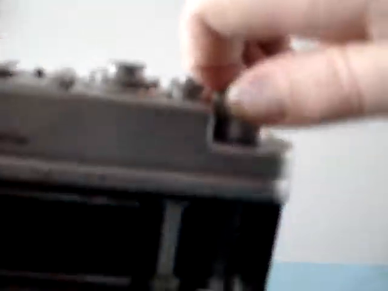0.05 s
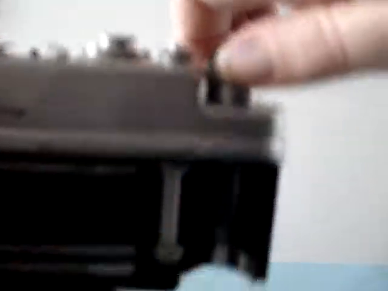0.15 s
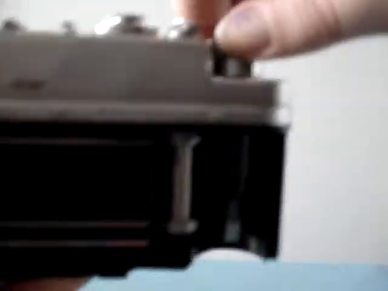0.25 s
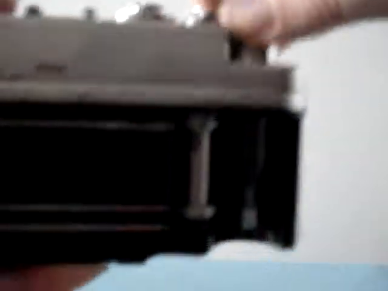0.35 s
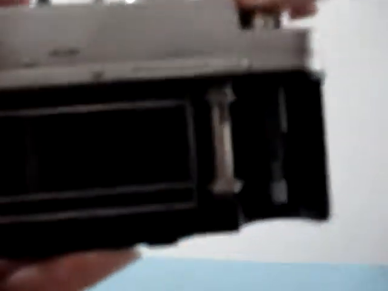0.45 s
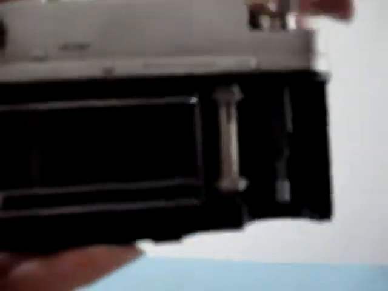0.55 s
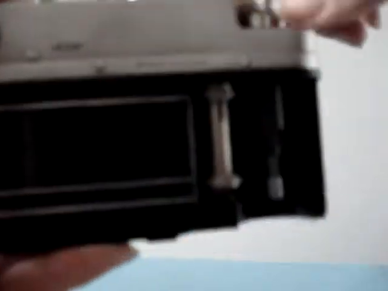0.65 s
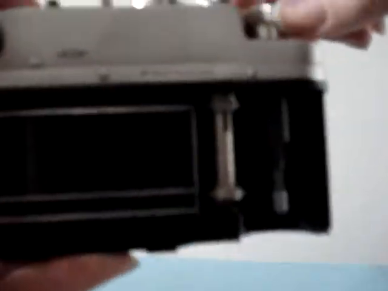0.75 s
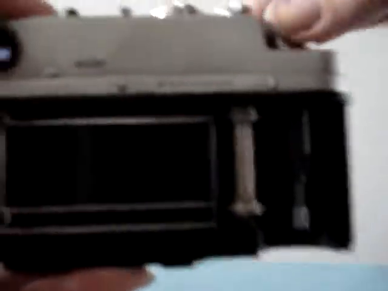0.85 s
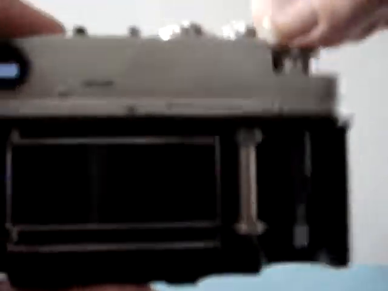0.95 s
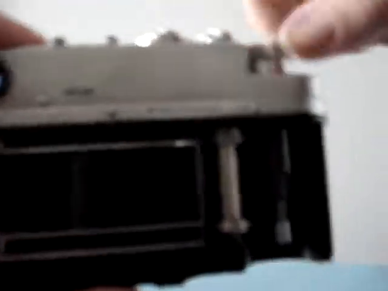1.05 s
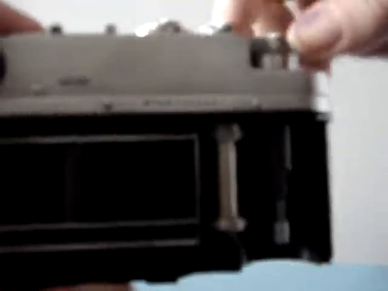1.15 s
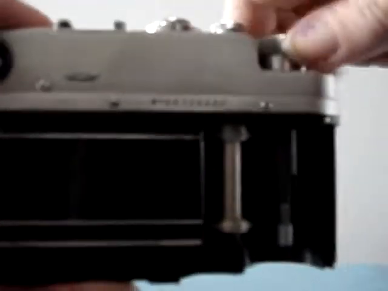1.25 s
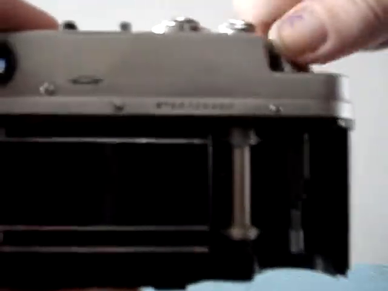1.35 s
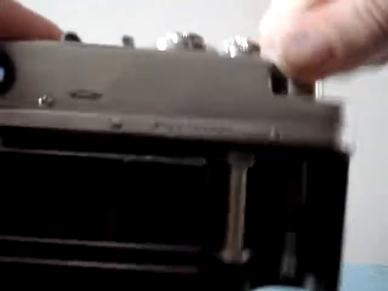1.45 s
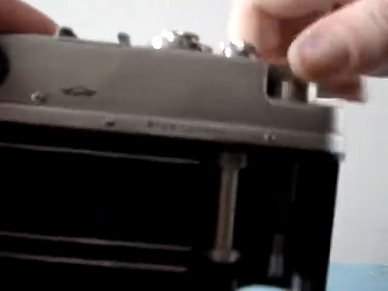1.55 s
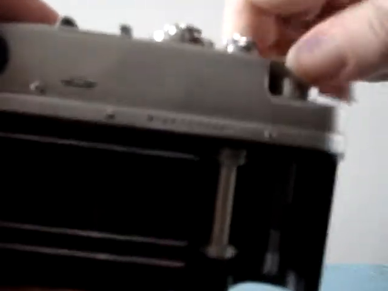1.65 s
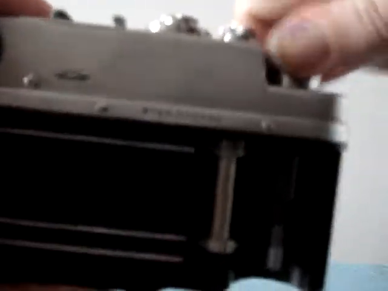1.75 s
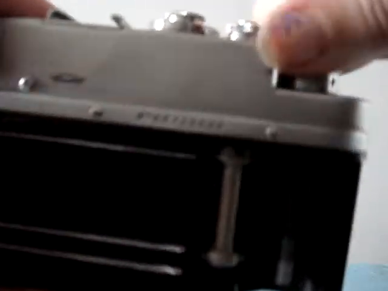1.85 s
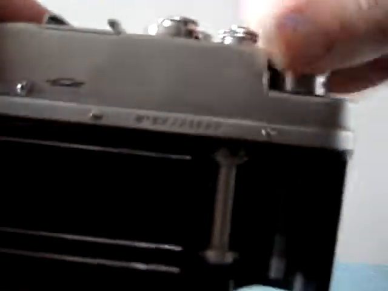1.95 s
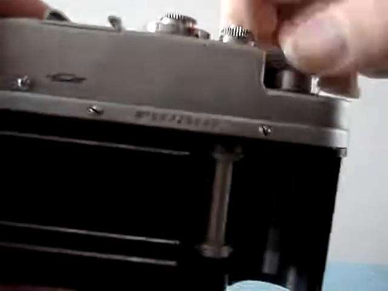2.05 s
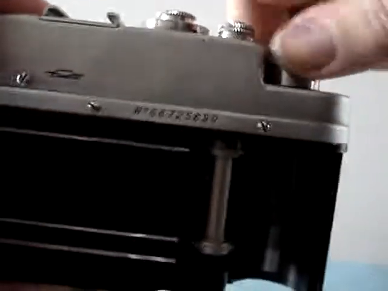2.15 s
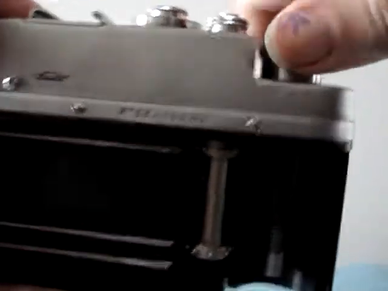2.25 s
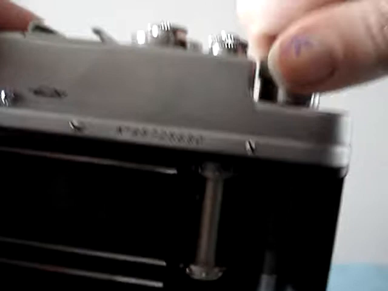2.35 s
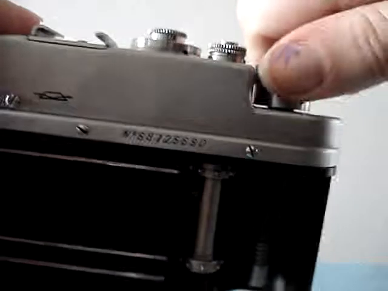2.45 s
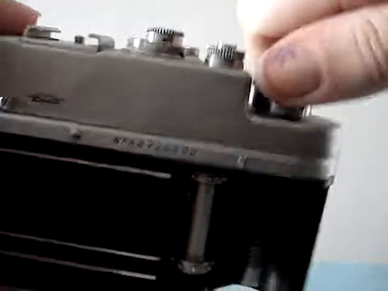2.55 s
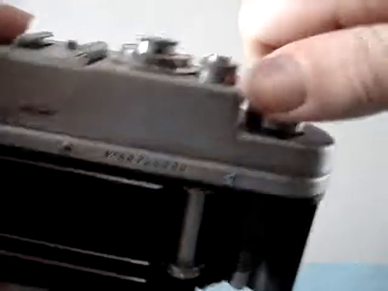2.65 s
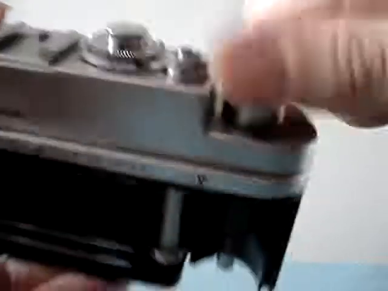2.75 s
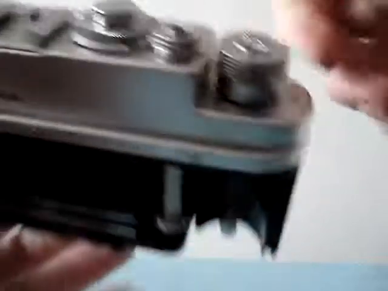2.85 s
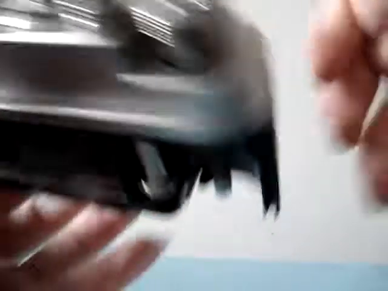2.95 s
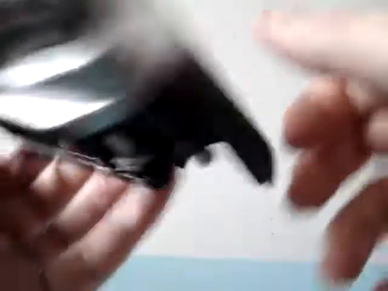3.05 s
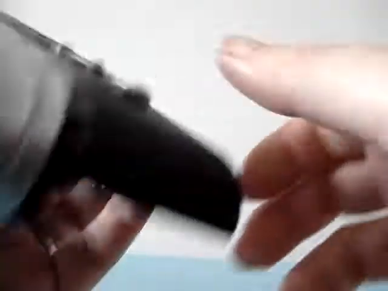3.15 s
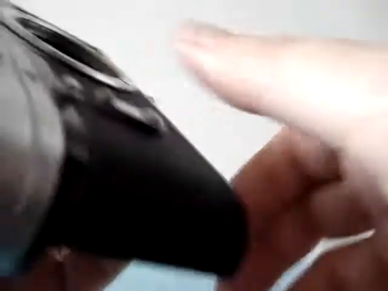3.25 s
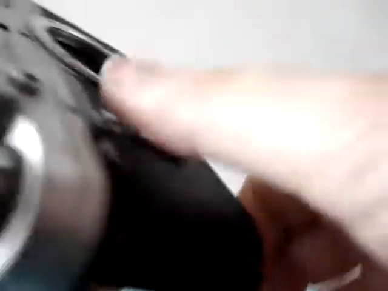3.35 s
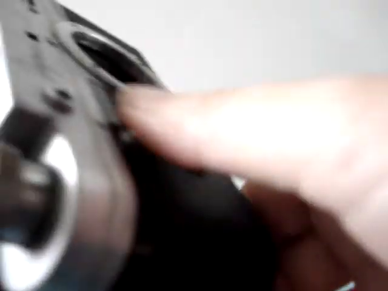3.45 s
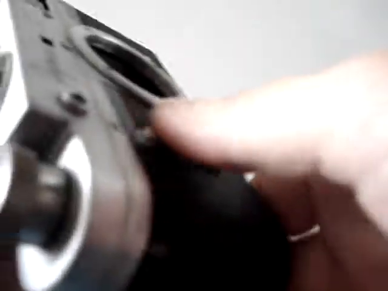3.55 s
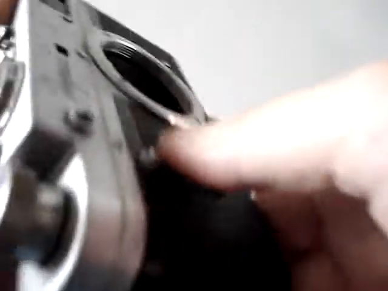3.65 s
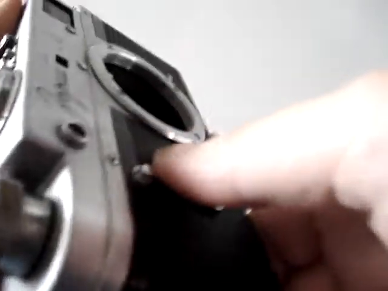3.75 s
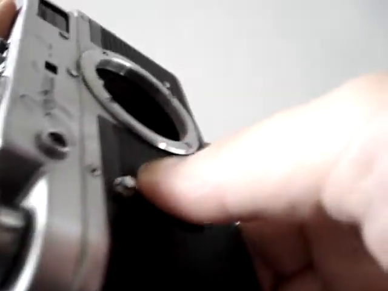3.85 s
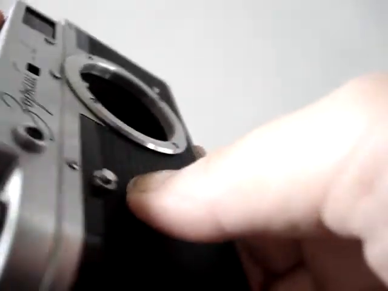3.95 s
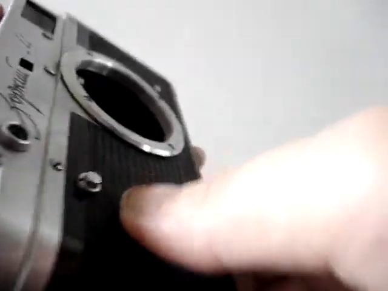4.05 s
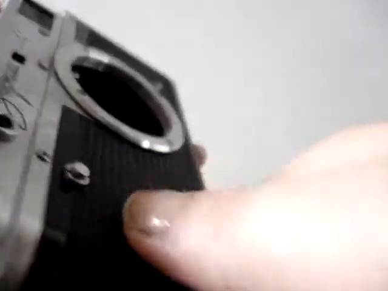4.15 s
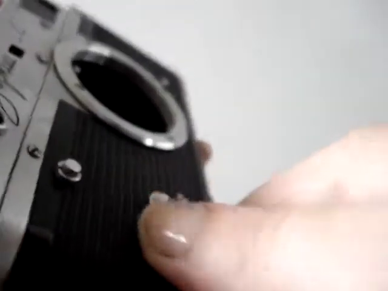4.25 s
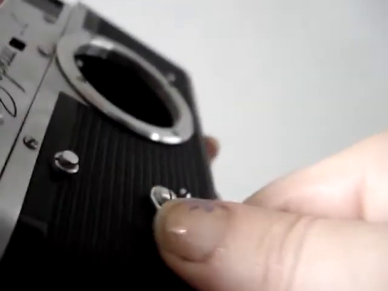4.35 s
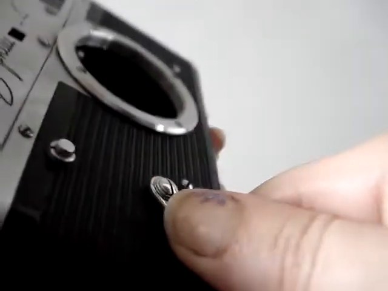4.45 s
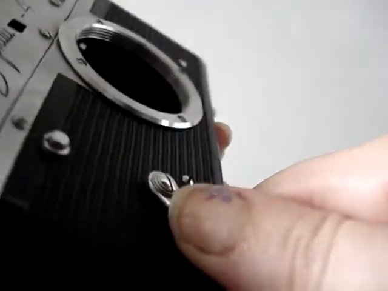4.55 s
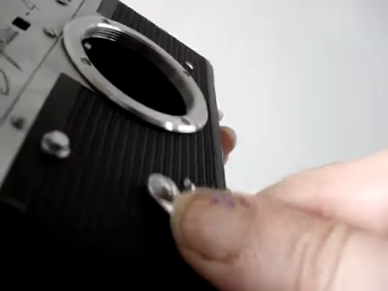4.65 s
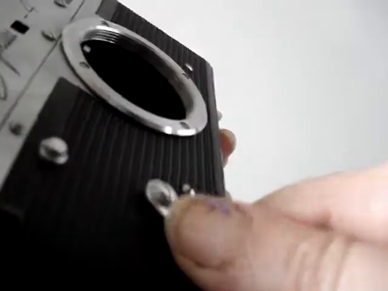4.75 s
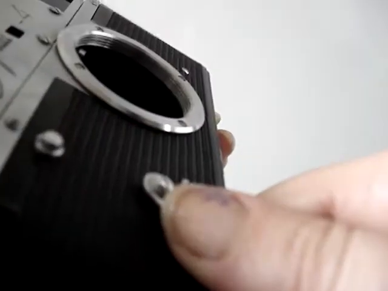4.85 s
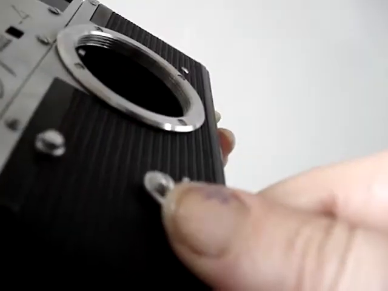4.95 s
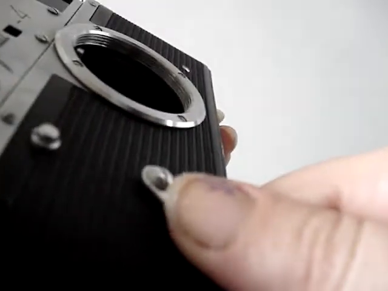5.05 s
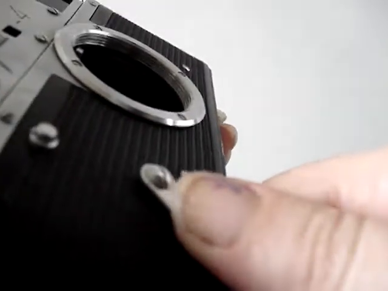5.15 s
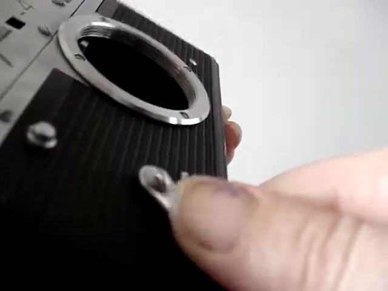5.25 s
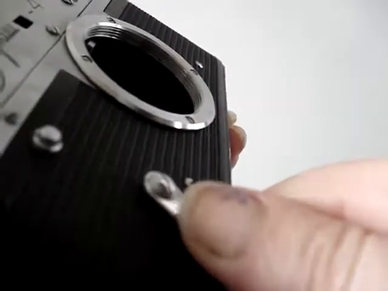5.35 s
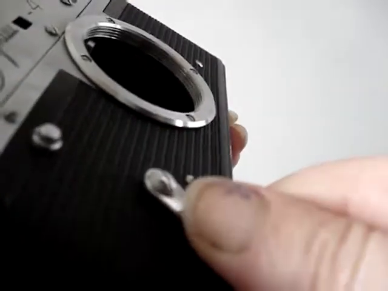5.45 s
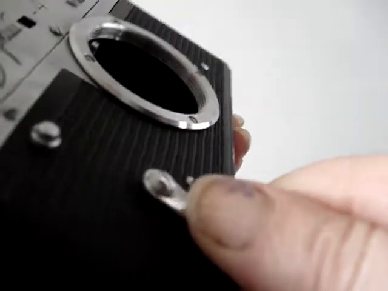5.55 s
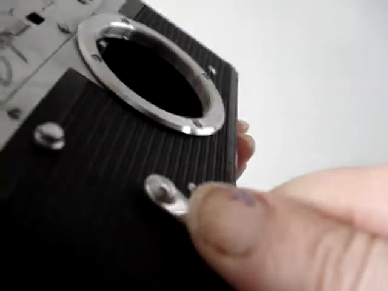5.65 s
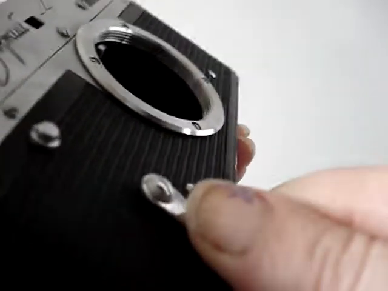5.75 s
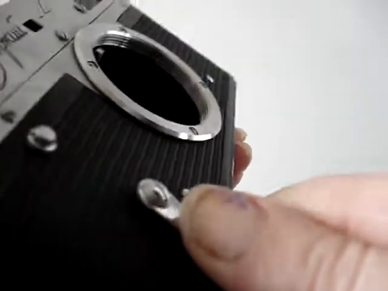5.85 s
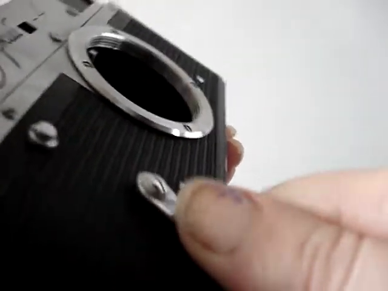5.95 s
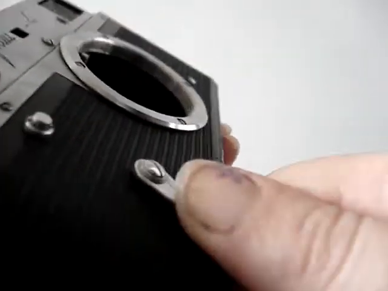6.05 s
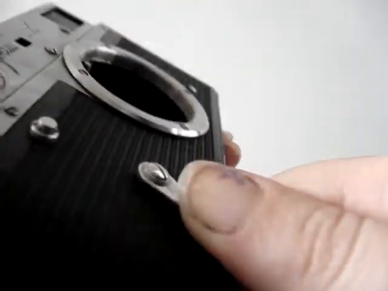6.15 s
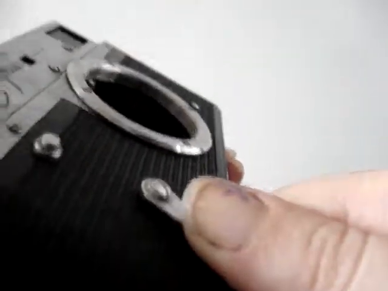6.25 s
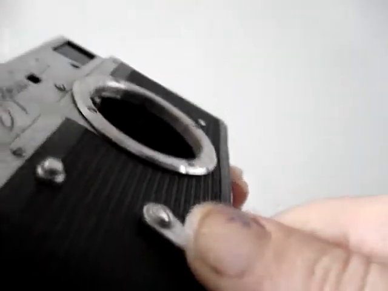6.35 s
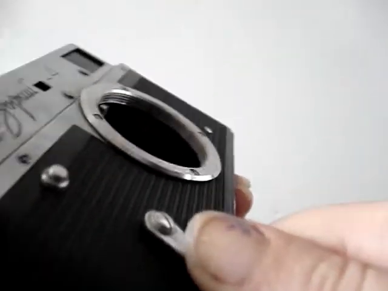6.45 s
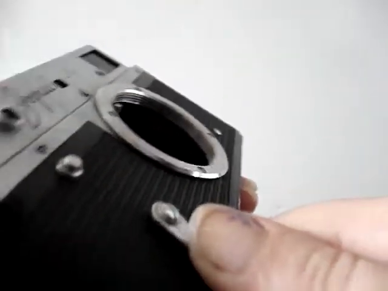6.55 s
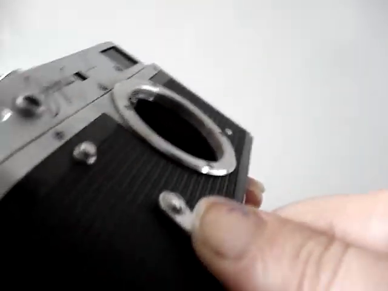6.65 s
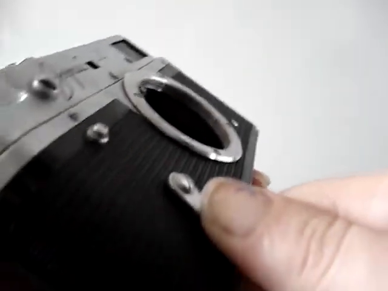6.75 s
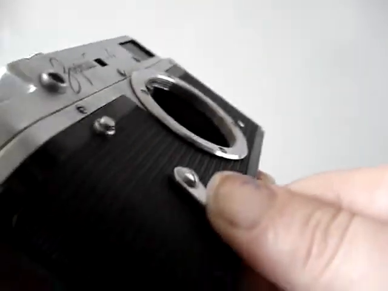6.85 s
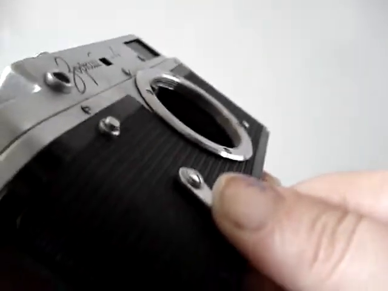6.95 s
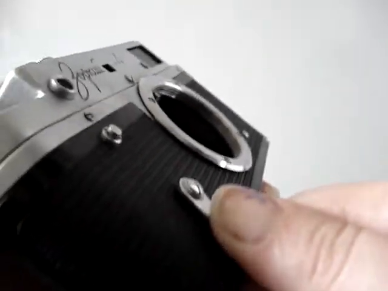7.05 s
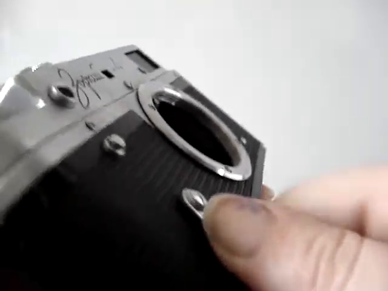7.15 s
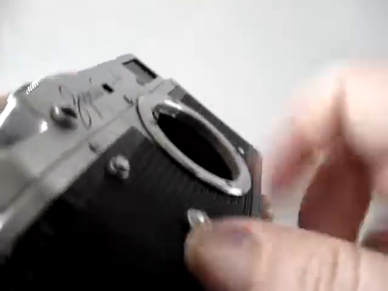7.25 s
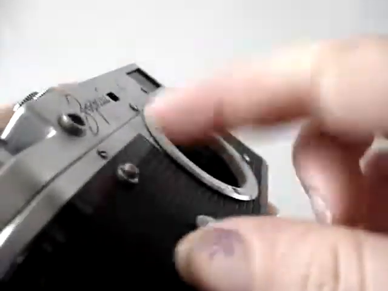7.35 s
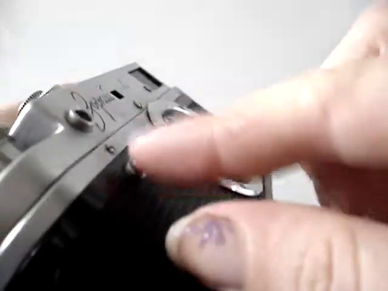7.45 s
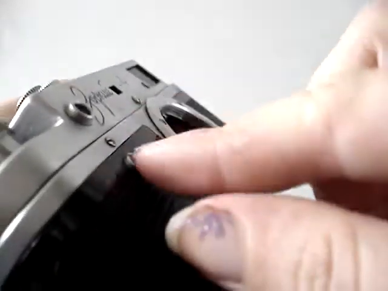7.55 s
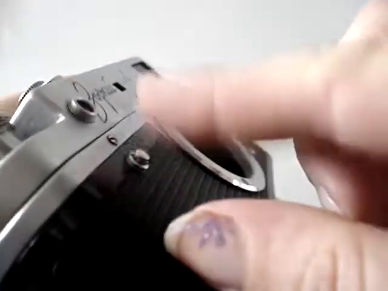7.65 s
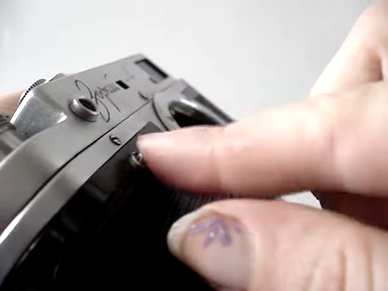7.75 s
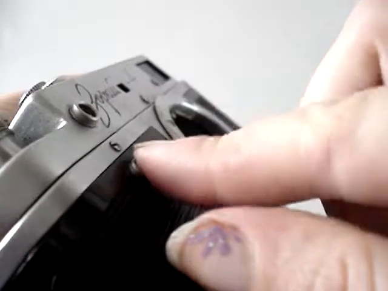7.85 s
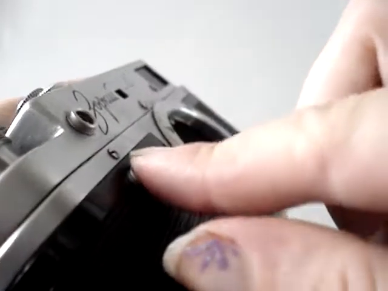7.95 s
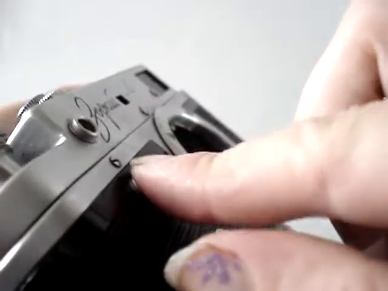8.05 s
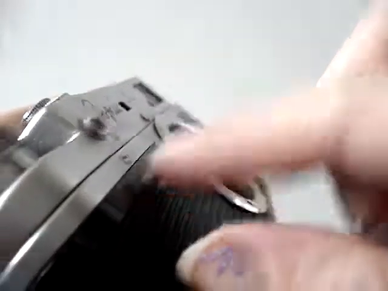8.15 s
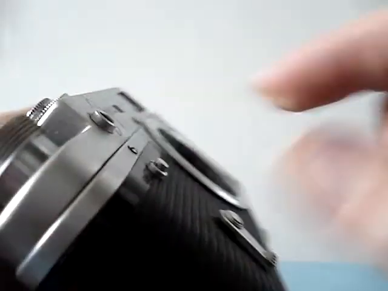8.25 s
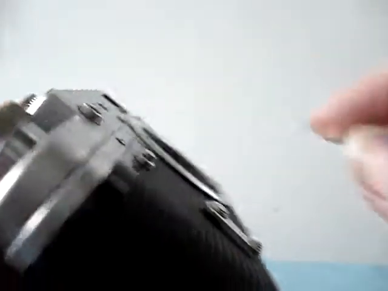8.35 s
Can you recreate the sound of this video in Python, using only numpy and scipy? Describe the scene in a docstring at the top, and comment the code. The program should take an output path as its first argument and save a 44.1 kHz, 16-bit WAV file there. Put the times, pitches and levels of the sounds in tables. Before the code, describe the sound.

An old metal camera is handled close to the microphone while a fan whirrs softly in the room. Its rewind knob scrapes and ticks unevenly, with one sharp snap. The self-timer lever is then wound in a quick ratcheting run, followed by a sharp click and a few single teeth. Near the end a button is pressed and the clockwork starts a bright, rapid buzz with a few low bumps.

```python
"""Handling a clockwork camera

An old mechanical camera is handled close to a mono microphone, over the whirr of a fan. Its rewind knob
scrapes and ticks; the self-timer lever is wound over a ratchet, in a run and then tooth by tooth; a button
frees the clockwork, whose escapement buzzes. Friction and impacts excite the resonances of the metal."""
import sys
import numpy as np
from scipy import signal
from scipy.fft import rfft, irfft, next_fast_len
from scipy.io import wavfile
from scipy.ndimage import map_coordinates

SR = 44100
rng = np.random.default_rng(int(sys.argv[2]) if len(sys.argv) > 2 else 0)


def unload_wav(signal):
    """Save mono or channel-first audio to the path in sys.argv[1] as 16-bit WAV at rate SR, clipped to [-1, 1]."""
    wavfile.write(
        sys.argv[1],
        SR,
        np.round(np.clip(np.atleast_2d(signal).T, -1, 1) * 32767).astype(np.int16),
    )


N = 370440
TOP_HZ = 10080

# the fan's air noise: (frequency [Hz], relative spectral level [dB])
FAN_AIR = [(15, -52), (25, -23), (48, -13.5), (113, -7), (141, -5), (168, -6.5), (195, -3), (271, -4.5),
           (619, -4.5), (795, -7.5), (2280, -14.5), (2520, -15), (7590, -22.5), (8180, -22.5),
           (10000, -26.5), (13000, -53), (22000, -120)]
# its hum and thin whines: (frequency [Hz], level [dB], width [Hz], unsteady share [0-1])
FAN_HUM = [(196, -72.5, 6, .35), (245, -78, 6, .35), (442, -74, 8, .4), (548, -77, 25, .6),
           (622, -75, 14, .7), (638, -69, 6, .3), (687, -73.5, 6, .35), (735, -78, 6, .35)]
FAN_WHINES = [(2848, -84, 6, .25), (8129, -75, 12, .2)]
# the room's decay: (frequency [Hz], reverberation time [s])
ROOM_T60 = [(200, 1), (2000, 0.23), (10000, 0.14)]
# low thumps under the sharpest jolts: (time [s], peak level [dB], decay time [s])
JOLTS = [(1.88, -32.5, 0.0051), (3.564, -32.5, 0.0087), (7.927, -31.5, 0.011), (7.951, -31.5, 0.019),
         (8.044, -35.5, .011), (8.08, -41, 0.014), (8.209, -44, .012)]

# resonances of the case as each part excites it: (frequency [Hz], width [Hz], relative level [dB])
KNOB_MODES = [(543, 114, -4.5), (1060, 150, -3), (1520, 95, -1), (1836, 95, 3), (2600, 48, -5.5),
              (3340, 40, -17.5), (5330, 150, -13.5), (5920, 140, -16), (7600, 740, -20)]
SHAFT_MODES = [(1520, 90, 2), (2200, 150, -7), (2500, 90, -3), (3480, 130, 6.5), (5360, 160, -3),
               (5900, 170, -1), (7310, 140, -2), (7900, 230, -1.5), (9130, 240, -0.5)]
STOP_MODES = [(1223, 57, 7), (2400, 260, -6), (3510, 150, 2.5), (5130, 170, -4.5), (5900, 220, -2),
              (6920, 220, -2), (8500, 170, 1), (9650, 500, -5.5)]
PAWL_MODES = [(1215, 90, -5.5), (1800, 50, -7), (2050, 120, -10), (2360, 55, -4), (2550, 55, -4),
              (2860, 110, -5), (3470, 250, -3.5), (4400, 120, -10), (4700, 150, -10), (5240, 130, -4),
              (5720, 140, 1), (6090, 260, -2), (7100, 400, -4), (8230, 220, 0.5), (9110, 450, 2)]
CLOCKWORK_MODES = [(1200, 65, -10), (1530, 45, -14), (1800, 45, -9), (2360, 50, -6), (2530, 55, -7),
                   (2850, 60, -7), (2960, 65, -3), (3120, 45, -6), (3560, 120, -3.5), (3760, 90, -8),
                   (4380, 110, -3.5), (5110, 60, -3.5), (5400, 160, -8), (5710, 160, -1.5),
                   (5955, 60, -2.5), (6130, 160, -5), (6410, 60, -4), (7590, 130, -6), (7900, 200, -4),
                   (8510, 120, -3.5), (9080, 380, 0), (9680, 260, -1.5)]
# the dense, heavily damped ring between them: (frequency [Hz], relative spectral level [dB])
KNOB_BODY = [(300, -32), (700, -13), (1100, -2), (1800, 5), (2800, -5), (5000, -13.5), (10000, -16.5)]
STOP_BODY = [(300, -12), (900, -15), (1300, -1.5), (2500, 8.5), (4200, -4.5), (7000, -12), (10000, -4)]
PAWL_BODY = [(590, -49), (1000, -49), (1220, -17.5), (1500, -13), (2860, -9.5), (4120, -8), (5830, 0.5),
             (7640, 5.5), (8910, 10), (10000, 1), (13000, -43), (22000, -120)]
CLOCKWORK_BODY = [(350, -54), (600, -27), (961, -62), (1250, -6.5), (1630, -15), (1750, -8.5), (2870, -5),
                  (4390, -6), (4650, -6), (5750, -8), (6700, -6.5), (7630, -3), (10000, -1), (13000, -38),
                  (22000, -120)]

# single contacts: (time [s], low-band level [dB], high-band level [dB])
KNOB_KNOCKS = [(0.2865, -38.5, -46), (0.3067, -51, -50.5), (0.3812, -42.5, -63), (0.7126, -49.5, -63),
               (0.7546, -43.5, -65), (0.8367, -47, -50), (0.8598, -40, -48), (0.8722, -48, -47.5),
               (1.0421, -49, -51), (1.1426, -59, -52.5), (1.3112, -43.5, -52), (1.321, -42, -46.5),
               (1.3527, -46, -45.5), (1.383, -43.5, -46.5), (1.7254, -47.5, -54), (1.7607, -58, -47.5),
               (1.8247, -49, -47.5), (1.9693, -51.5, -54), (2.1471, -47.5, -47.5), (2.1686, -40.5, -54),
               (2.2042, -50, -45), (2.7132, -51, -53.5), (2.7808, -42.5, -51)]  # the rewind knob catches hard in its seat
SHAFT_SNAPS = [(1.879, -35, -28.5)]  # its shaft snaps home
STOP_CLICKS = [(3.5641, -50, -42), (4.8043, -35, -33), (7.1077, -46, -48.5), (7.8487, -48, -55)]  # the timer's lever and button meet their stops
# fingers twist the knob: (centre time [s], Gaussian half-width [s], relative level [dB])
KNOB_RUBS = [(0.4, 0.024, -53.5), (0.76, 0.014, -55), (0.863, 0.02, -46), (0.955, 0.016, -55),
             (1.389, 0.045, -55), (1.799, 0.042, -53), (2.207, 0.009, -51)]
# the thumb winds the lever in one run: (time [s], teeth passed [count])
LEVER_TRAVEL = [(3.917, 0), (3.978, 8), (4.015, 11), (4.05, 12), (4.068, 13), (4.174, 22), (4.267, 33),
                (4.331, 38), (4.412, 45), (4.443, 47), (4.47, 48), (4.591, 54)]
# then nudges it on tooth by tooth: (time [s], level relative to a tooth of the run [dB])
LEVER_NUDGES = [(4.6692, 1), (5.3474, 1), (5.3681, 1.5), (5.3793, -3), (5.3948, 1.5), (5.5009, 2.5),
                (5.5193, 1.5), (5.5354, 2.5), (5.5545, 3), (5.6512, 1.5), (5.7215, -0.5), (5.9365, -0.5),
                (5.9404, 2)]
# the running escapement: (time [s], beat rate [Hz])
BEAT_RATE = [(7.92, 270), (8.03, 258), (8.1, 270), (8.17, 270), (8.22, 360), (8.27, 305), (8.33, 293),
             (8.4, 430)]


def amp(db):
    """Amplitude ratio of a level in decibels."""
    return 10 ** (np.asarray(db) / 20)


def unit(x):
    """The signal scaled to an rms of 1."""
    return x / np.sqrt(np.mean(x ** 2) + 1e-20)


def sample_times():
    """The time of every sample in seconds."""
    return np.arange(N) / SR


def along(points, hz):
    """Interpolation of (frequency, value) points on a logarithmic frequency axis."""
    f, v = np.transpose(points)
    return np.interp(np.log(hz + 1), np.log(f + 1), v)


def wobble(rate):
    """Smooth random modulation: a spline through rate knots a second."""
    return map_coordinates(rng.standard_normal(int(N * rate / SR) + 4), [np.arange(N) * rate / SR])


def filtered(x, response):
    """Zero-phase filtering: the spectrum is multiplied by a gain that depends on frequency."""
    size = next_fast_len(N + SR // 2)
    return irfft(rfft(x, size) * response(np.fft.rfftfreq(size, 1 / SR)), size)[:N]


def crossover(split_hz, order=20):
    """Power-complementary gains below and above split_hz; the upper band rolls off at TOP_HZ."""
    below = lambda hz, edge_hz, order: 1 / np.sqrt(1 + (hz / edge_hz) ** order)
    under = lambda hz: below(hz, split_hz, order)
    return under, lambda hz: np.sqrt(1 - under(hz) ** 2) * below(hz, TOP_HZ, 2 * order)


def fan(air_db=-55):
    """Broadband air noise plus tones, each broadened by random modulation of amplitude and phase."""
    t = sample_times()
    air = unit(filtered(rng.standard_normal(N), lambda hz: amp(along(FAN_AIR, hz)) * (hz < TOP_HZ)))
    hum = np.zeros(N)
    for hz, db, width, share in FAN_HUM + FAN_WHINES:
        waver = 1 - share + share * (wobble(width) + 1j * wobble(width))
        hum += amp(db) * unit(np.real(waver * np.exp(2j * np.pi * hz * t)))
    return amp(air_db) * air + hum


def room(x, tail_db=-16, first_wall_s=0.015, build_s=0.0016):
    """Diffuse reverberation: wall reflections arrive after a gap and decay fastest in the treble."""
    hz, t, noise = signal.stft(rng.standard_normal(SR // 2), SR, nperseg=256)
    arrival = .5 + .5 * np.tanh((t - first_wall_s) / build_s)
    decay = amp(-60 * t / along(ROOM_T60, hz)[:, None])
    tail = signal.istft(noise * arrival * decay, SR, nperseg=256)[1]
    return signal.oaconvolve(x, amp(tail_db) * tail / np.linalg.norm(tail))[:N]


def thumps(rise_s=0.00041, recoil_s=0.03):
    """Low thumps: a one-sided bump in the microphone signal, high-passed so that it swings back slowly."""
    t = np.arange(SR // 4) / SR
    out = np.zeros(N + SR)
    for s, db, decay_s in JOLTS:
        bump = (1 - np.exp(-(t / rise_s) ** 2)) * np.exp(-t / decay_s)
        out[round(s * SR):][:len(t)] += amp(db) * bump / bump.max()
    return signal.lfilter([1, -1], [1, 1 / (recoil_s * SR) - 1], out[:N])


def metal(modes, body, body_db, band=lambda hz: 1, size=8192):
    """Modal superposition: the normalised impulse response of resonances standing on a broad body."""
    hz = np.fft.rfftfreq(size, 1 / SR)
    power = sum(amp(db) ** 2 / (1 + ((hz * hz - f * f) / (hz * width + 1)) ** 2)
                for f, width, db in modes)
    gain = np.sqrt(power + amp(along(body, hz) + body_db) ** 2) * band(hz)
    # folding the cepstrum makes the response causal, with minimum phase
    cepstrum = irfft(np.log(gain + 1e-6))
    cepstrum[1:size // 2] *= 2
    cepstrum[size // 2 + 1:] = 0
    return irfft(np.exp(rfft(cepstrum))) / np.sqrt(np.mean(gain ** 2 * (hz < TOP_HZ)))


def chatter(peak_s, rise_s, decay_s):
    """Contact force as a noise burst of tiny impacts; returns (first sample, force)."""
    samples = np.arange(round((peak_s - .01) * SR), round((peak_s + .04) * SR))
    t = samples / SR - peak_s
    return samples[0], rng.standard_normal(len(t)) * np.exp(np.minimum(t / rise_s, -t / decay_s))


def contacts(rows, modes, body, body_db, split_hz, rise_s, low_decay_s, high_decay_s, vary_db, detune=0):
    """Impact excitation: each contact rings the metal, with one level below split_hz and one above."""
    out = np.zeros(N + SR)
    under, over = crossover(split_hz)
    click_samples = .0066 * SR  # a level is the rms of the ring's energy spread over this length
    for s, low_db, high_db in rows:
        # no two contacts land on the same spot, so the resonances share the blow differently
        struck = [(hz * (1 + detune * rng.standard_normal()), width, db + vary_db * rng.standard_normal())
                  for hz, width, db in modes]
        for db, decay_s, band in (low_db, low_decay_s, under), (high_db, high_decay_s, over):
            start, force = chatter(s, rise_s, decay_s)
            ring = signal.fftconvolve(force, metal(struck, body, body_db, band, size=2048))
            out[start:start + len(ring)] += amp(db) * ring * np.sqrt(click_samples / np.sum(ring ** 2))
    return out[:N]


def rewind_knob(catches=14, catch_low_db=-53, catch_high_db=-59, scatter_db=2.5, rub_gain_db=5.5):
    """Stick-slip friction: the knob rubs with a gritty hiss, catches at random and knocks in its seat."""
    t = sample_times()
    stroke = sum(amp(db) * np.exp(-.5 * ((t - s) / width) ** 2) for s, width, db in KNOB_RUBS)
    # the harder it rubs, the more often it catches
    quantiles = (np.arange(catches) + rng.random(catches)) / catches
    catch_times = np.interp(quantiles, np.cumsum(stroke) / stroke.sum(), t)
    catch_levels = [catch_low_db, catch_high_db] + scatter_db * rng.standard_normal((catches, 2))
    rows = np.vstack([KNOB_KNOCKS, np.column_stack([catch_times, catch_levels])])
    knocks = contacts(rows, KNOB_MODES, KNOB_BODY, body_db=-6.5, split_hz=3170,
                      rise_s=0.00028, low_decay_s=0.0066, high_decay_s=0.0037, vary_db=4)
    grit = unit(rng.standard_normal(N) * amp(7.2 * wobble(500)))
    rub = signal.oaconvolve(stroke * grit, metal(KNOB_MODES, KNOB_BODY, body_db=-9))[:N]
    return knocks + amp(rub_gain_db) * rub


def snaps():
    """Hard impacts: shaft, lever and button reach their stops with a ringing click."""
    shaft = contacts(SHAFT_SNAPS, SHAFT_MODES, STOP_BODY, body_db=-5.5, split_hz=4640,
                     rise_s=0.00087, low_decay_s=0.0063, high_decay_s=0.0039, vary_db=2.5)
    timer = contacts(STOP_CLICKS, STOP_MODES, STOP_BODY, body_db=-10, split_hz=4260,
                     rise_s=0.0009, low_decay_s=0.0056, high_decay_s=0.0043, vary_db=0.5)
    return shaft + timer


def ratchet(low_db=-41, high_db=-40, scatter_db=1.15, tension_db_per_tooth=0.0251):
    """An impact train: at every tooth the lever passes, the pawl drops off the crest and chatters."""
    times, passed = np.transpose(LEVER_TRAVEL)
    teeth = np.arange(passed[-1] + 1)
    drop_times = np.interp(teeth, passed, times)
    low_scatter, high_scatter = scatter_db * rng.standard_normal((len(teeth), 2)).T
    # the tightening spring shakes the case harder
    tension_db = tension_db_per_tooth * (teeth - teeth.mean())
    run = list(zip(drop_times, low_db + tension_db + low_scatter, high_db + high_scatter))
    nudges = [(s, low_db + db, high_db + db) for s, db in LEVER_NUDGES]
    return contacts(run + nudges, PAWL_MODES, PAWL_BODY, body_db=-2.5, split_hz=6280, rise_s=0.0013,
                    low_decay_s=0.0024, high_decay_s=0.0017, vary_db=2.5, detune=0.0045)


def turned_away(buzz, start_s=8.22, fade_db_per_s=55, centre_hz=6200, half_width_hz=530):
    """Directivity: one treble band of the buzz fades as the camera is turned."""
    band = filtered(buzz, lambda hz: np.exp(-((hz - centre_hz) / half_width_hz) ** 4))
    remaining = amp(-fade_db_per_s * np.maximum(sample_times() - start_s, 0))
    return buzz - band * (1 - remaining)


def escapement(release_s=7.924, spin_up_s=0.0035, weakening_db=1, rattle_db=-7, decay_beats=0.38):
    """Forced vibration: the anchor's blows on the escape wheel and the gears' rattle drive the case."""
    t = sample_times()
    beats = np.cumsum(np.interp(t, *np.transpose(BEAT_RATE))) / SR + 0.039 * wobble(120)
    # most teeth are caught squarely, some only weakly
    strength = amp(-weakening_db * rng.exponential(size=N))[np.abs(beats).astype(int)]
    # a pallet slides into its tooth, so each blow swells before it dies
    phase = beats % 1
    blows = unit(np.sqrt(phase) * np.exp(-phase / decay_beats))
    force = unit(rng.standard_normal(N) * strength * np.hypot(blows, amp(rattle_db)))
    running_s = np.maximum(t - release_s, 0)
    drive = force * np.minimum(running_s / spin_up_s, 1) ** 2
    under, over = crossover(split_hz=7000)
    buzz = np.zeros(N)
    for band, start_db, growth_db_per_s in (under, -32.5, 3), (over, -32, 8):
        case = metal(CLOCKWORK_MODES, CLOCKWORK_BODY, body_db=-7.5, band=band)
        buzz += signal.oaconvolve(drive * amp(start_db + growth_db_per_s * running_s), case)[:N]
    return buzz


def scene():
    """Superposition of the camera, its reverberation, the thumps and the fan, alike in both channels."""
    camera = rewind_knob() + ratchet() + snaps() + turned_away(escapement())
    mono = camera + room(camera) + thumps() + fan()
    return np.array([mono, mono])


def record(dry, ceiling_db=-31.5, window_s=0.039, edge_width_hz=120):
    """Automatic gain control holds down sustained loud sound; a steep low-pass ends the band."""
    heard = filtered(dry[0], lambda hz: hz < TOP_HZ)
    smoothing = 1 / (window_s * SR)
    rms = np.sqrt(np.abs(signal.lfilter([smoothing], [1, smoothing - 1], heard ** 2)))
    gain = (1 + (rms / amp(ceiling_db)) ** 10) ** (-1 / 10)
    low_pass = lambda hz: np.clip((TOP_HZ - hz) / edge_width_hz + .5, 0, 1)
    return np.array([filtered(channel * gain, low_pass) for channel in dry])


dry = scene()
out = record(dry)
unload_wav(out)
```